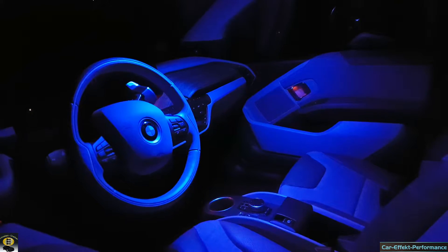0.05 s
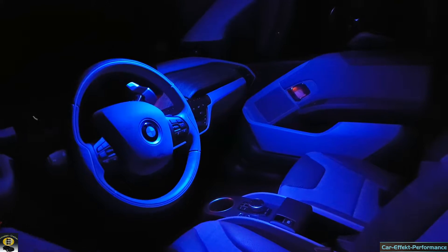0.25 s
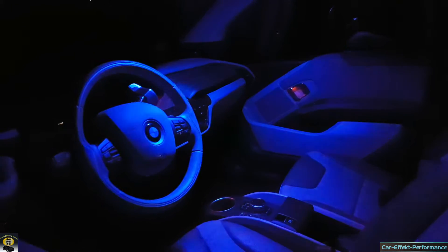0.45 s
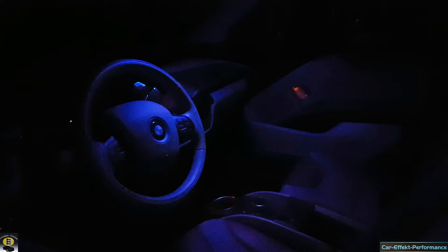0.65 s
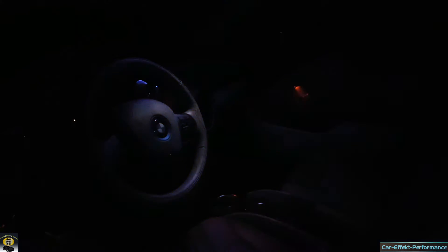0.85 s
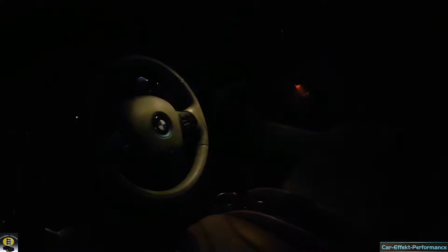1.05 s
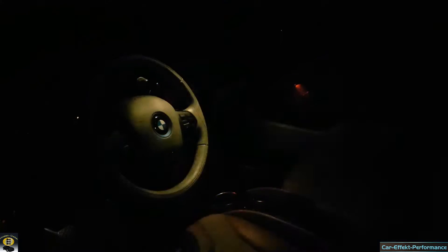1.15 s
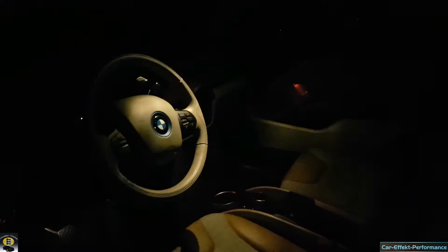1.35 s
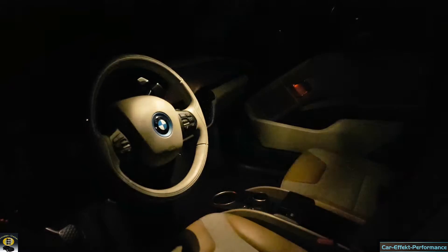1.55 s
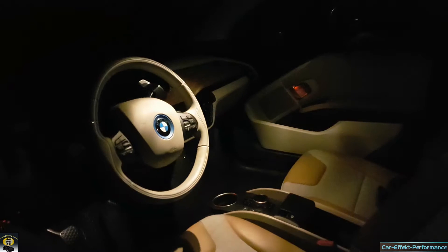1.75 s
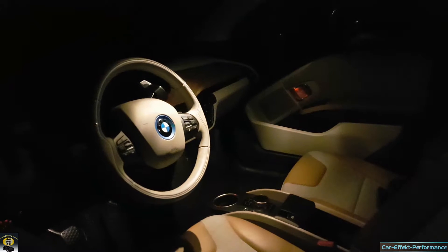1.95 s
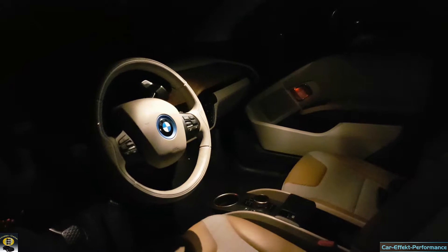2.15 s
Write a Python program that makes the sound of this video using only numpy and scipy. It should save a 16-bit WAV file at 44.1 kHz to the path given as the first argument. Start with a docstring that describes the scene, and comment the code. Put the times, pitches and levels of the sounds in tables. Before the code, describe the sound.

A car's central locking works, heard from inside the quiet cabin. Faint clacks lead to a heavy thump at about 0.2 seconds. Knocks, clacks and a small motor whirr follow, ending in a sharp metal snap on the right at about 0.65 seconds. One tiny squeak comes at 1.2 seconds and a switch clicks near 2.15 seconds. A faint low rumble lies underneath throughout.

```python
"""A few faint clacks, then a heavy thump: central locking works inside a parked, quiet car.
The bolts excite the door's damped modes, the linkages knock and clack, small geared motors whirr,
and a metal latch snaps at the end of their travel. Later something gives one tiny squeak and
a switch clicks, over a low cabin rumble."""
import sys
import numpy as np
from scipy import signal
from scipy.fft import rfft, irfft
from scipy.io import wavfile

SR = 44100
rng = np.random.default_rng(int(sys.argv[2]) if len(sys.argv) > 2 else 0)


def wav_out(sig):
    """Save sig, one row per channel (or a flat mono array), as 16-bit PCM at SR to the path in sys.argv[1]."""
    wavfile.write(sys.argv[1], SR, np.round(np.clip(np.atleast_2d(sig).T, -1, 1) * 32767).astype(np.int16))


N = 97020
T = np.arange(N) / SR


def undb(db):
    """Amplitude ratio of a level in decibels."""
    return 10 ** (np.asarray(db) / 20)


def pan(db):
    """Constant-power panning; db, like every pan_db, is left minus right."""
    gains = undb(np.array([[db], [-db]]) / 2)
    return gains / np.sqrt(np.mean(gains ** 2))


def curve(rows):
    """Gain interpolated between (time_s, level_db) points; silent before the first."""
    return undb(np.interp(T, *np.array(rows).T, left=-200))


def noise(spectrum, alike_hz=840):
    """Shaped stereo noise of rms 1; coherence between the ears falls above alike_hz."""
    f = np.maximum(np.arange(N // 2 + 1) * SR / N, 1)
    hz, db = np.array(spectrum).T
    gain = undb(np.interp(np.log(f), np.log(hz), db)) * np.minimum(f / hz[0], 1) ** 2
    coherence = 1 / (1 + (f / alike_hz) ** 2)
    mid, side = rfft(rng.standard_normal((2, N)))
    ears = mid * np.sqrt(1 + coherence) + np.array([[1], [-1]]) * side * np.sqrt(1 - coherence)
    x = irfft(gain * ears, N)
    return x / x.std()


def strike(at, rise_s, t60_s):
    """Impact envelope: a smooth rise and exponential decay."""
    age = np.maximum(T - at, 0)
    attack = np.sin(np.pi / 2 * np.minimum(age / rise_s, 1)) ** 2
    return attack * np.exp(-np.minimum(np.log(1000) * age / t60_s, 20))


def ring(at, hz, db, rise_s, t60_s, pan_db):
    """Damped harmonic oscillator, swinging from the middle of the push."""
    swing = np.sin(2 * np.pi * hz * (T - at - rise_s / 2))
    return pan(pan_db) * undb(db) * strike(at, rise_s, t60_s) * swing


def rattle(rows, spectrum, rise_s, alike_hz):
    """Dense modes overlap into noise; successive blows add in power."""
    power = sum((undb(db) * strike(at, rise_s, t60)) ** 2 for at, db, t60 in rows)
    return noise(spectrum, alike_hz) * np.sqrt(power)


def clatter(rows, spectrum, rise_s, alike_hz):
    """Struck parts share one material's spectrum, and each adds its own resonance."""
    material = noise(spectrum, alike_hz)
    blows = 0
    for at, db, t60, hz, boost in rows:
        resonance = signal.lfilter(*signal.iirpeak(hz, Q=9.8, fs=SR), material)
        blows += undb(db) * strike(at, rise_s, t60) * (material + undb(boost) * resonance)
    return blows


# hard stops of the bolts and soft heaves of the door: start_s, level_db, contact_s
BOLT_BLOWS = [(0.2213, -12, 0.00095), (0.2372, -6, 0.016), (.266, -21, 0.002), (0.287, -24.5, 0.0025),
              (0.397, -27, 0.0053), (0.686, -28.5, 0.0085)]
# door modes: pitch_hz, gain_db, t60_s, pan_db
DOOR_MODES = [(87, -29, 0.09, 6), (119.4, -6, 0.11, -1.5), (164.4, -7.5, 0.11, -5),
              (213, -26, 0.029, -13.5), (294.5, -12.5, 0.13, -10), (469.5, 2, 0.054, -8.5),
              (620, -11.5, 0.035, -7.5), (756, -14.5, 0.035, -6)]


def bolts():
    """Impact excitation: longer contact weakens the high modes; the first bolt pumps the cabin air."""
    door = sum(ring(at, hz, db + gain, 0.0045, t60, side) / (1 + (hz * contact) ** 2)
               for at, db, contact in BOLT_BLOWS for hz, gain, t60, side in DOOR_MODES)
    boom = ring(BOLT_BLOWS[0][0], hz=42.5, db=-21.5, rise_s=0.018, t60_s=0.25, pan_db=0)
    return door + boom


# the latch's snap and bounces: start_s, level_db
LATCH_SNAPS = [(0.6558, -24.5), (0.6582, -32.5), (0.664, -47), (0.6726, -54)]
# latch modes: pitch_hz, gain_db, t60_s, pan_db
LATCH_MODES = [(1615, -19.5, 0.062, 15.5), (1990, -18.5, 0.06, -24), (2345, -19.5, 0.059, -2),
               (2720, -18, .07, -20), (3330, -7, 0.056, -22), (3150, -13, 0.04, -3),
               (3578, -0.5, 0.027, -11), (3930, -18, 0.036, -9), (5820, -9.5, 0.019, -26),
               (6150, -7, 0.014, -26)]
# chatter as it seats: frequency_hz, density_db
CHATTER_SPECTRUM = [(2000, -16), (3000, -1.5), (3450, 8.5), (3900, -12), (4400, -3.5), (5100, -40.5),
                    (5900, -4), (6700, -11.5), (7600, -30), (15000, -39)]


def latch():
    """Superposition: each bounce of a metal latch on the right adds to its ring and chatter."""
    modes = 0
    for hz, gain, t60, side in LATCH_MODES:
        envelope = sum(undb(db) * strike(at, 0.00079, t60) for at, db in LATCH_SNAPS)
        modes += pan(side) * undb(gain) * envelope * np.sin(2 * np.pi * hz * (T - LATCH_SNAPS[0][0]))
    bursts = [(at, db - 5.5, 0.042) for at, db in LATCH_SNAPS]
    return modes + pan(-8) * rattle(bursts, CHATTER_SPECTRUM, rise_s=0.00017, alike_hz=1500)


# knocks on the door panels: start_s, level_db, t60_s, pan_db
PANEL_KNOCKS = [(0.239, -25.5, 0.078, 3.5), (0.27, -26, 0.039, -5), (0.286, -26, 0.086, -5.5),
                (0.391, -32.5, 0.067, 3), (0.404, -34.5, 0.12, 4), (0.415, -36.5, 0.079, -19),
                (0.4517, -37, 0.093, 10), (0.467, -35.5, 0.062, -15), (0.634, -43, 0.048, 6),
                (0.6438, -29.5, 0.018, 8), (0.692, -48, 0.19, -4)]
# responses of the panels and the door cavity: frequency_hz, density_db
PANEL_SPECTRUM = [(35, -3), (75, 1.5), (130, -27.5), (220, 5), (340, -8), (450, -7.5), (580, -3.5),
                  (850, -14), (1300, -33), (3000, -68)]
CAVITY_SPECTRUM = [(55, -26), (73, 8.5), (100, -12), (165, 6.5), (205, -14), (270, -10.5), (480, -11),
                   (550, -5.5), (610, -52), (690, -39.5), (850, -16.5), (2000, -42)]
CAVITY_DB, CAVITY_T60_S = -9, 0.2


def panel_knocks():
    """Reverberation: rods knock the panels, and the hollow door stores the energy and rings on."""
    power = sum((pan(side) * undb(db) * strike(at, 0.0015, t60)) ** 2
                for at, db, t60, side in PANEL_KNOCKS)
    retention = np.exp(-2 * np.log(1000) / (CAVITY_T60_S * SR))
    stored = signal.lfilter([1 - retention], [1, -retention], power)
    cavity = undb(CAVITY_DB) * np.sqrt(stored) * noise(CAVITY_SPECTRUM, alike_hz=1200)
    return np.sqrt(power) * noise(PANEL_SPECTRUM, alike_hz=740) + cavity


# blows in the linkages: start_s, relative_db, t60_s, resonance_hz, boost_db
PLASTIC_CLACKS = [(.001, -44, 0.065, 520, 6), (.032, -49, 0.049, 890, -14), (.079, -55, 0.14, 2180, 7.5),
                  (.110, -53, 0.027, 1200, -4), (.149, -53.5, 0.17, 1500, -18),
                  (.2174, -28.5, 0.061, 1960, -9), (.232, -36, 0.27, 730, -2), (.2676, -26, 0.008, 1200, 3),
                  (.283, -33, 0.047, 1100, 14.5), (.303, -37, 0.052, 1440, 5.5),
                  (.349, -43, 0.058, 1300, 9), (.376, -47, 0.057, 2920, 17),
                  (.3865, -31.5, 0.057, 1050, 17), (.398, -35, 0.07, 1400, 7), (.406, -38, 0.051, 2450, 19),
                  (.4495, -33, 0.069, 1040, 6), (.6355, -41, 0.1, 830, 15.5), (.6435, -44.5, .025, 740, 11),
                  (.656, -44.5, 0.14, 2000, 0), (.709, -50, 0.033, 2900, 10.5)]
METAL_TICKS = [(.2176, -39.5, 0.0084, 5900, 16.5), (.2235, -51, 0.039, 7100, 13),
               (.233, -43.5, 0.023, 4340, 7), (.2405, -44.5, 0.042, 5440, 10),
               (.258, -42.5, 0.072, 3770, 5), (.2678, -31.5, 0.012, 4550, -1), (.283, -55, 0.025, 4600, 24),
               (.2997, -38, 0.018, 4700, 7), (.3085, -36, 0.015, 4500, 5), (.6556, -34.5, 0.014, 6140, 2)]
# responses of the two materials: frequency_hz, density_db
PLASTIC_SPECTRUM = [(200, 9.5), (500, 4.5), (850, -4.5), (1170, 0.5), (1700, -0.5), (2500, -6.5),
                    (3300, -10), (4600, -19), (7000, -28), (9000, -37), (15000, -49)]
METAL_SPECTRUM = [(800, -1), (2200, 2.5), (3700, 5), (5000, 3), (6000, -3.5), (7300, 0), (9000, -12.5),
                  (15000, -6)]


def linkages():
    """Free vibration after impact: plastic levers clack, small metal parts tick higher."""
    clacks = clatter(PLASTIC_CLACKS, PLASTIC_SPECTRUM, rise_s=0.00023, alike_hz=720)
    ticks = clatter(METAL_TICKS, METAL_SPECTRUM, rise_s=0.0003, alike_hz=1500)
    return pan(-4.5) * undb(-2) * clacks + pan(-3.5) * undb(-3.5) * ticks


# catches dropping in: start_s, pitch_hz, level_db, t60_s, pan_db
PAWL_CLICKS = [(.2679, 1804, -21.5, .008, -11), (0.2995, 4810, -28.5, 0.0068, -11)]


def pawls():
    """Rapid damping: two catches ring so briefly that they are heard as clicks."""
    return sum(ring(at, hz, db, 0.00031, t60, side) for at, hz, db, t60, side in PAWL_CLICKS)


# jolts of the drive: start_s, level_db
DRIVE_JOLTS = [(.392, -40.5), (0.4522, -31.5), (0.5027, -40), (0.635, -36), (0.6435, -29.5), (.6551, -39.5)]
# lock housing modes: pitch_hz, gain_db, t60_s, pan_db
HOUSING_MODES = [(93, -3.5, 0.11, 4.5), (203.4, -1, .15, -3.5), (354, -10.5, 0.083, 10),
                 (446.5, -10, 0.13, -3), (543, -5, 0.19, 4), (730, -12, 0.077, -4), (869, -18.5, 0.13, -7)]


def housing():
    """Modal response: the hollow housing rings as the drive takes up slack and hits its end stop."""
    return sum(ring(at, hz, db + gain, 0.0013, t60, side)
               for at, db in DRIVE_JOLTS for hz, gain, t60, side in HOUSING_MODES)


# envelopes of the motors' whirr and hiss: time_s, level_db
WHIRR_LEVEL = [(.212, -43.5), (.22, -43.5), (.31, -44), (.335, -45.5), (.43, -46), (.49, -43.5),
               (.55, -46.5), (.63, -43.5), (.67, -55.5), (.72, -59), (.78, -68), (.85, -100)]
HISS_LEVEL = [(.215, -64), (.25, -67), (.266, -50), (.278, -84), (.33, -69), (.43, -67.5), (.48, -60),
              (.625, -58.5), (.645, -81), (.9, -100)]
# their spectra: frequency_hz, density_db
WHIRR_SPECTRUM = [(24, 0), (40, -5.5), (64, -0.5), (200, -5), (284, -14.5), (432, -20.5), (466, -26),
                  (541, -9.5), (866, -25), (2780, -22.5), (6620, -36), (8690, -57), (15000, -58)]
HISS_SPECTRUM = [(2500, 8), (5000, 7.5), (7000, 9), (9000, 0.5), (13000, 3), (16000, 1.5)]
GEAR_HZ, GEAR_DEPTH = 115, 0.12


def motors():
    """Amplitude modulation: gear teeth flutter the whirr of small motors, under a treble hiss."""
    flutter = 1 + GEAR_DEPTH * np.sin(2 * np.pi * GEAR_HZ * T)
    whirr = noise(WHIRR_SPECTRUM) * flutter * curve(WHIRR_LEVEL)
    bass = signal.sosfilt(signal.butter(1, 900, fs=SR, output="sos"), whirr)
    hiss = noise(HISS_SPECTRUM) * curve(HISS_LEVEL)
    return pan(3) * bass + pan(-8) * (whirr - bass) + hiss


# a chirp and the ring it leaves: start_s, pitch_hz, level_db, rise_s, t60_s, pan_db
SQUEAK_TONES = [(1.191, 2864, -29.5, 0.012, 0.027, -5.5), (1.199, 2610, -55.5, .004, 0.062, -16),
                (1.199, 584, -47.5, 0.0058, 0.16, 1.5)]
# rubbing noise: frequency_hz, density_db
RUB_SPECTRUM = [(900, -14), (1150, 6), (1600, -16), (2900, -9.5), (4100, -4), (4600, -14.5), (5500, -14),
                (7500, -26)]


def squeak():
    """Friction: a settling part rubs and chirps, leaving a low ring."""
    envelope = undb(-60.5) * strike(SQUEAK_TONES[0][0], rise_s=0.003, t60_s=0.083)
    rub = pan(-6) * envelope * noise(RUB_SPECTRUM)
    return rub + sum(ring(*tone) for tone in SQUEAK_TONES)


# the switch snaps and settles: start_s, level_db, t60_s
SWITCH_CLICKS = [(2.1542, -34, 0.013), (2.156, -47, 0.046)]
# response of its body: frequency_hz, density_db
SWITCH_SPECTRUM = [(200, -23), (700, -7), (1500, -6.5), (2050, 0.5), (2900, 1), (3400, -6.5), (4200, -26),
                   (4950, -4.5), (6200, -22), (9000, -26), (12000, -21.5), (15000, -46)]


def switch():
    """Structure-borne sound: a switch snaps and the trim around it answers with a dull thud."""
    thud = undb(-51) * strike(SWITCH_CLICKS[0][0], rise_s=0.0073, t60_s=0.3) * noise(PANEL_SPECTRUM)
    snap = rattle(SWITCH_CLICKS, SWITCH_SPECTRUM, rise_s=0.00014, alike_hz=1800)
    return pan(-6.5) * snap + thud


# cabin noise in phase at the ears, in antiphase, and a low drone: frequency_hz, density_db
CABIN_MID_SPECTRUM = [(25, -24), (45, -10.5), (60, 4.5), (77, -9.5), (90, -3.5), (100, 6.5), (112, -6.5),
                      (150, -6), (195, -14.5), (280, -15.5), (370, -21.5), (650, -22), (1700, -27.5),
                      (3000, -36.5), (5100, -43), (9500, -49.5), (12500, -43), (16000, -43)]
CABIN_SIDE_SPECTRUM = [(25, -14), (60, 5), (110, -2), (220, -1), (430, -6), (750, -3), (1050, 0),
                       (1700, -6.5), (3000, -17.5), (5100, -23.5), (9500, -29), (12500, -21.5),
                       (16000, -23.5)]
DRONE_SPECTRUM = [(110, -21), (150, 8.5), (190, -3.5), (235, -6), (310, -7.5), (420, -35)]
# envelope of the drone: time_s, level_db
DRONE_LEVEL = [(0, -66), (.2, -57), (.8, -67.5), (1.7, -71.5), (1.92, -67.5), (2.2, -62)]


def cabin():
    """Enclosure resonances colour a low rumble, with a wide soft hiss and a drone that comes and goes."""
    mid = undb(-58) * noise(CABIN_MID_SPECTRUM)[0]
    side = undb(-67) * noise(CABIN_SIDE_SPECTRUM)[0]
    drone = noise(DRONE_SPECTRUM) * curve(DRONE_LEVEL)
    return pan(-1.06) * np.array([mid + side, mid - side]) + drone


def scene():
    """Sound pressures add: the locks, the small sounds after them and the cabin."""
    locks = bolts() + latch() + panel_knocks() + linkages() + pawls() + housing() + motors()
    return locks + squeak() + switch() + cabin()


def record(dry):
    """A steep elliptic low-pass removes the highest treble."""
    return signal.sosfilt(signal.ellip(10, 0.2, 70, 16100, fs=SR, output="sos"), dry)


dry = scene()
out = record(dry)
wav_out(out)
```